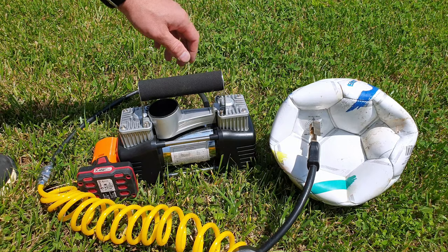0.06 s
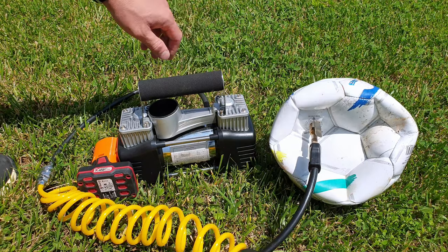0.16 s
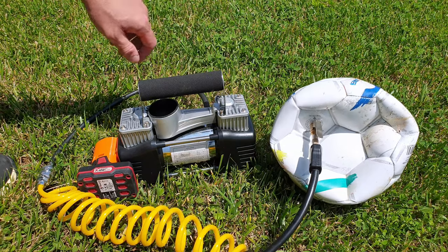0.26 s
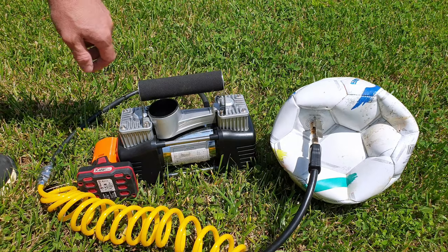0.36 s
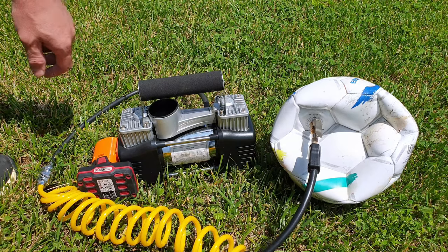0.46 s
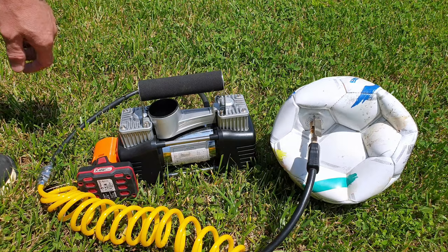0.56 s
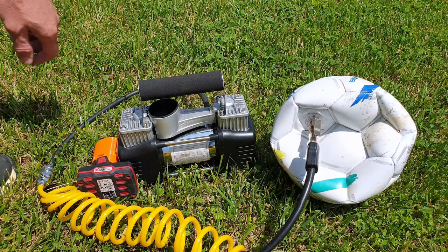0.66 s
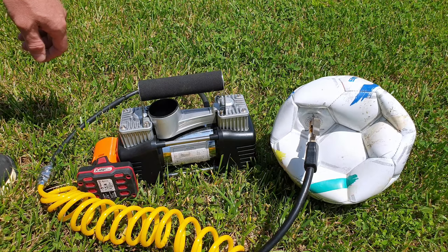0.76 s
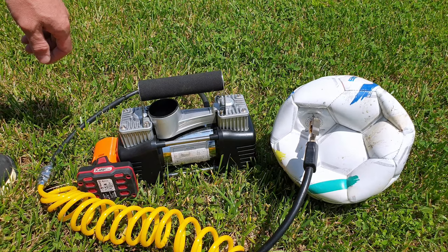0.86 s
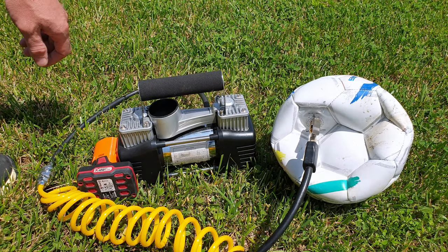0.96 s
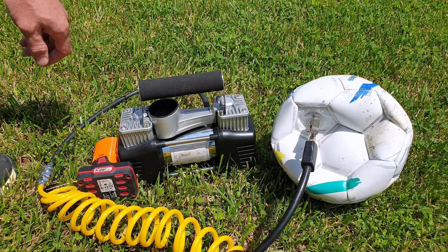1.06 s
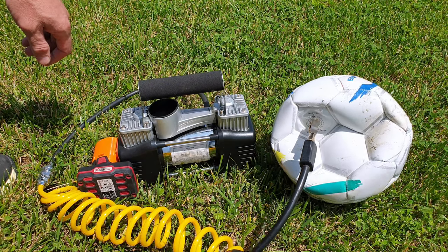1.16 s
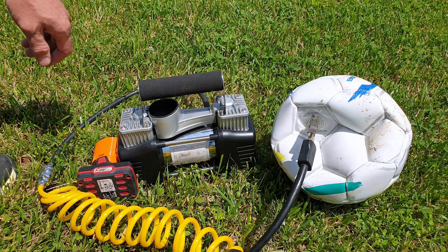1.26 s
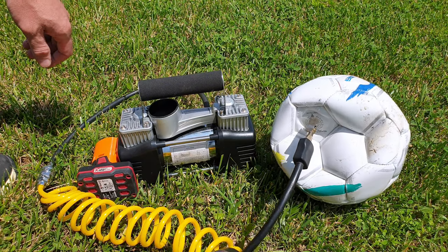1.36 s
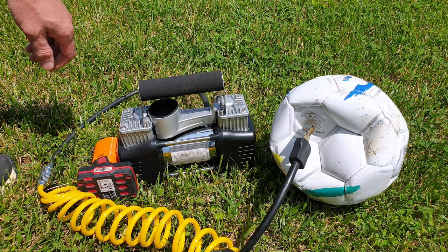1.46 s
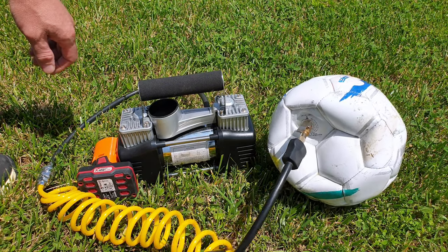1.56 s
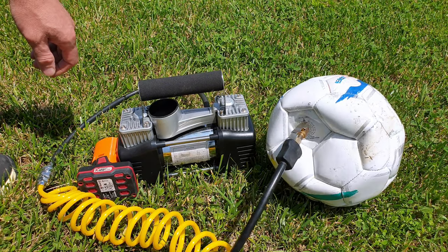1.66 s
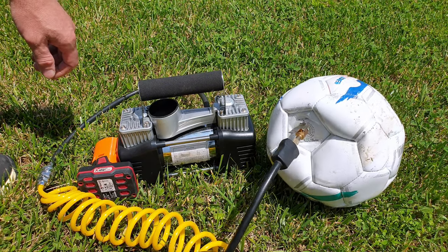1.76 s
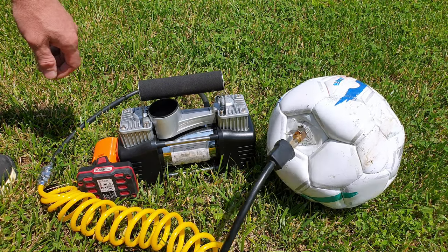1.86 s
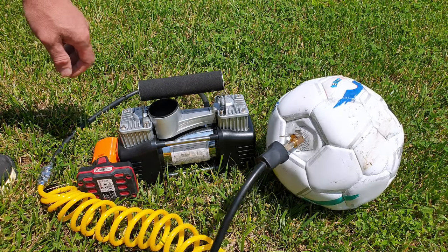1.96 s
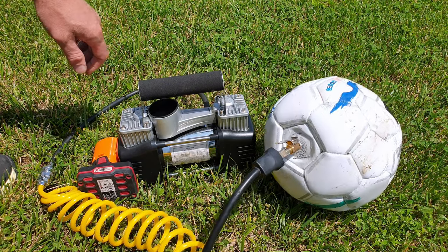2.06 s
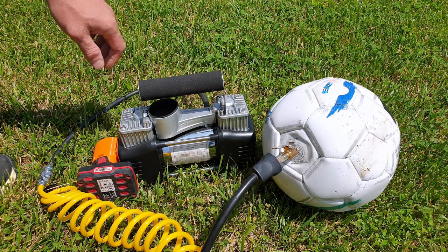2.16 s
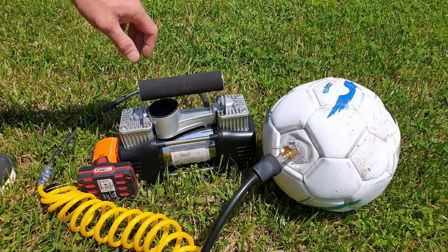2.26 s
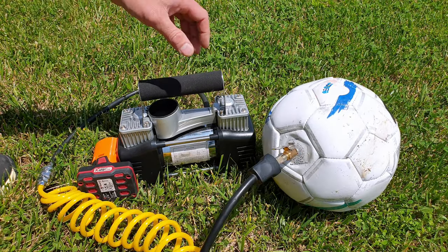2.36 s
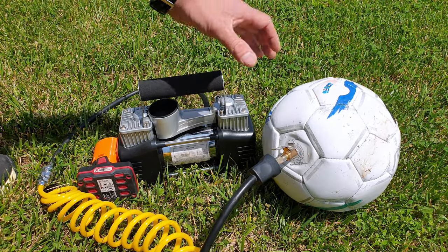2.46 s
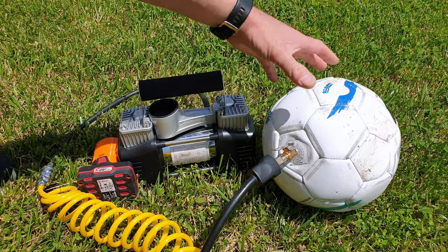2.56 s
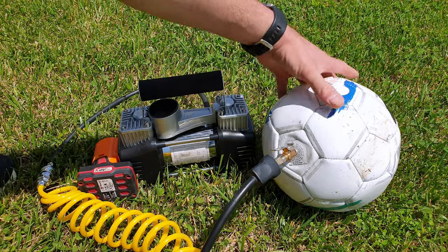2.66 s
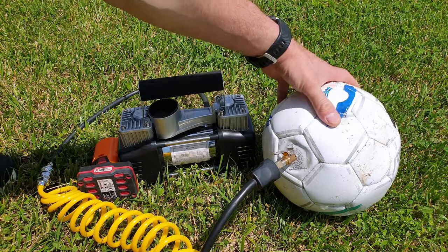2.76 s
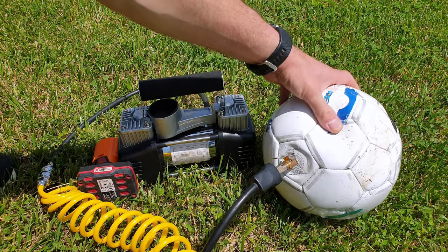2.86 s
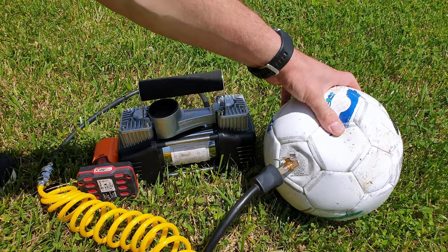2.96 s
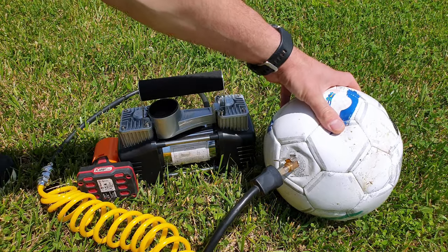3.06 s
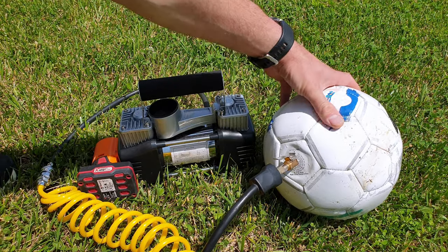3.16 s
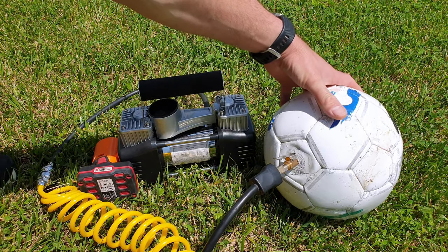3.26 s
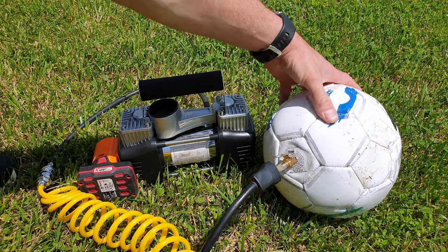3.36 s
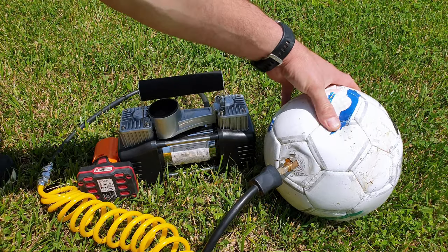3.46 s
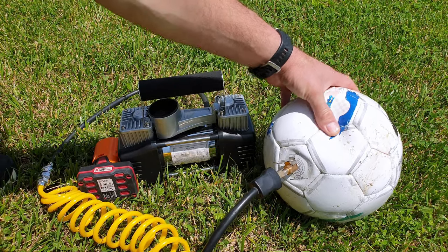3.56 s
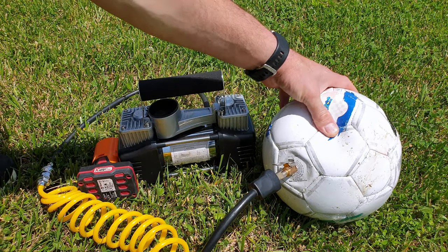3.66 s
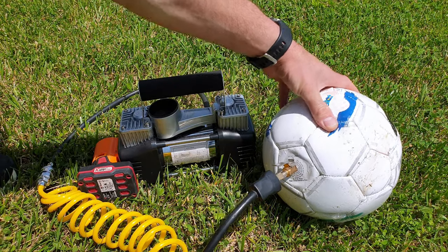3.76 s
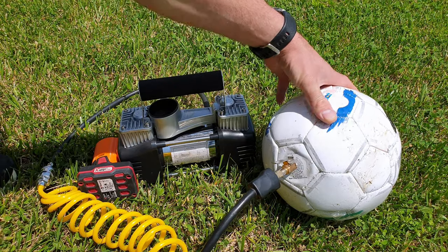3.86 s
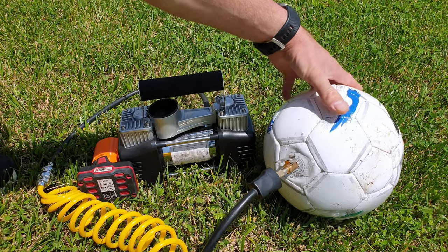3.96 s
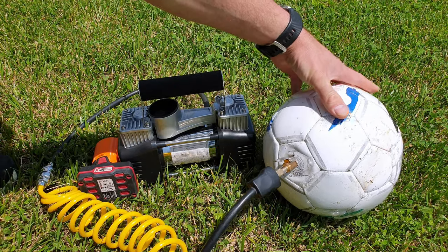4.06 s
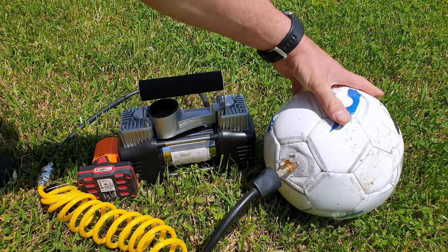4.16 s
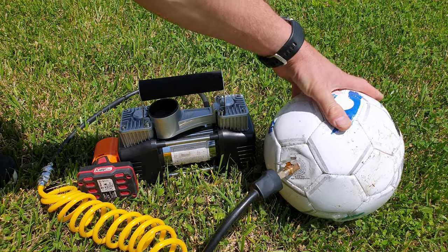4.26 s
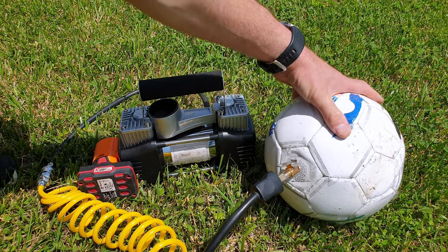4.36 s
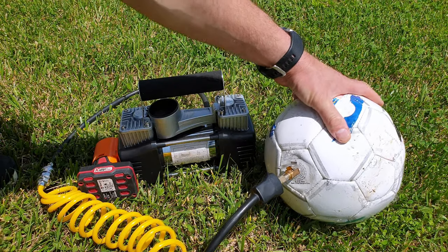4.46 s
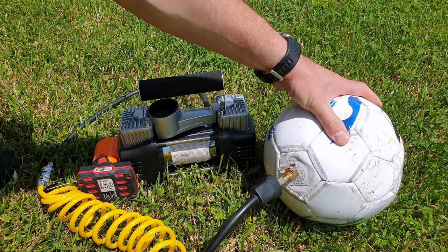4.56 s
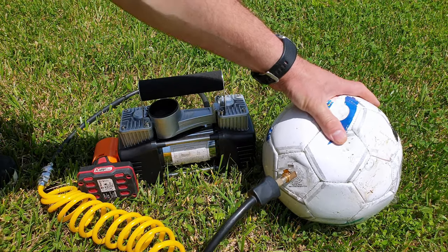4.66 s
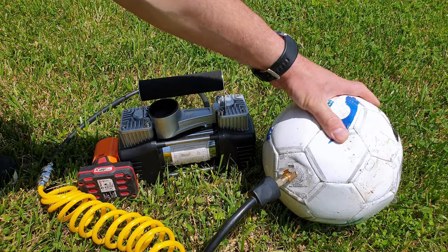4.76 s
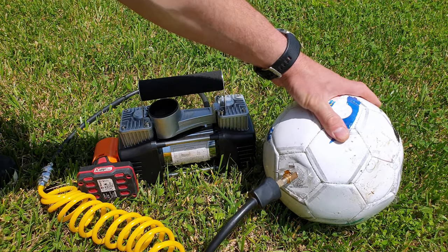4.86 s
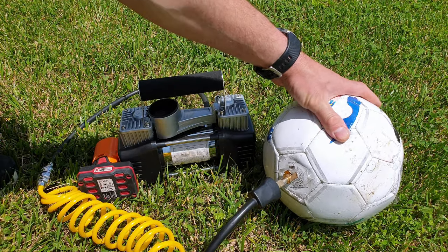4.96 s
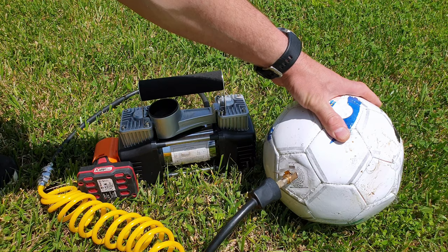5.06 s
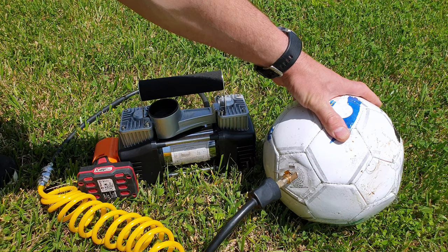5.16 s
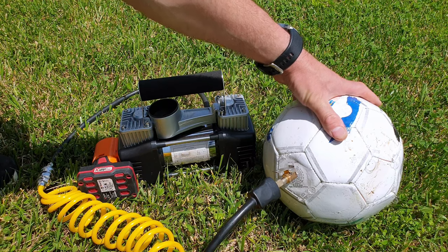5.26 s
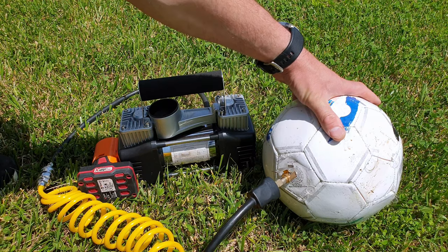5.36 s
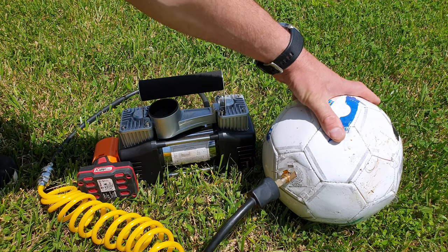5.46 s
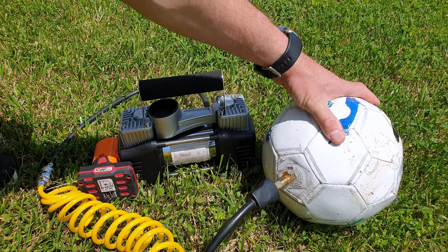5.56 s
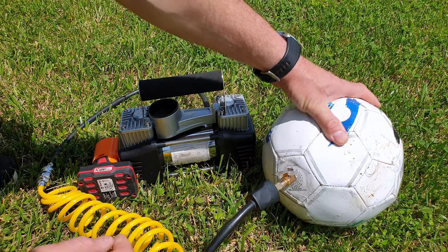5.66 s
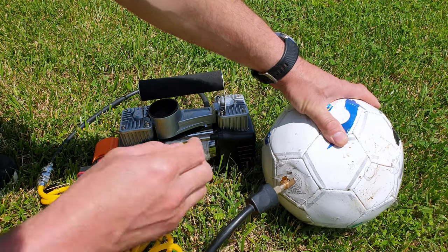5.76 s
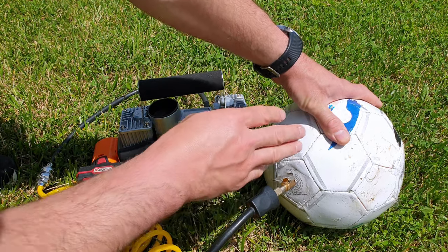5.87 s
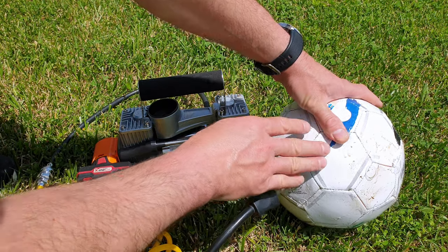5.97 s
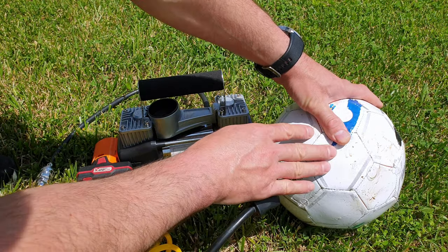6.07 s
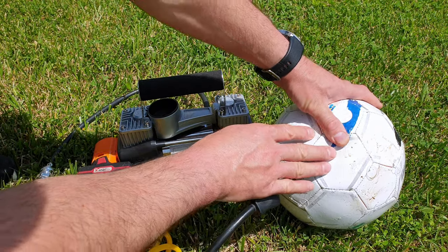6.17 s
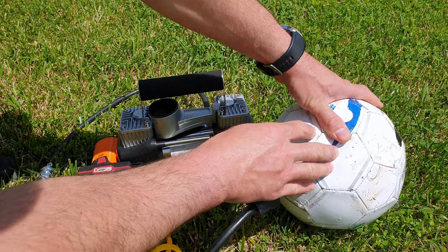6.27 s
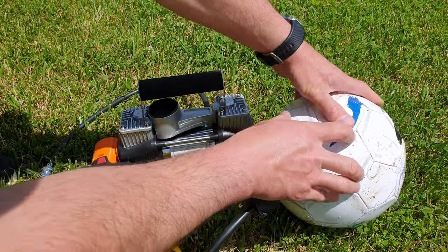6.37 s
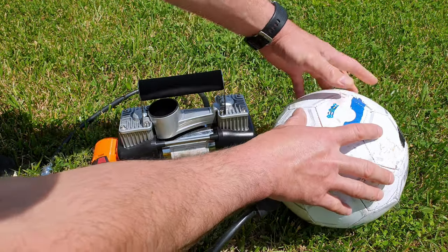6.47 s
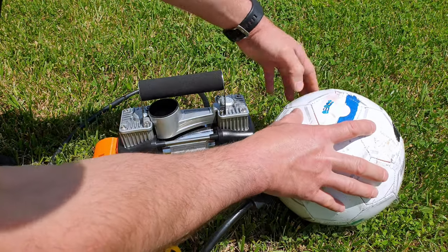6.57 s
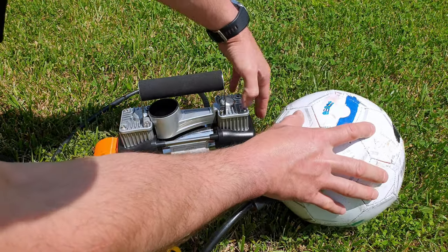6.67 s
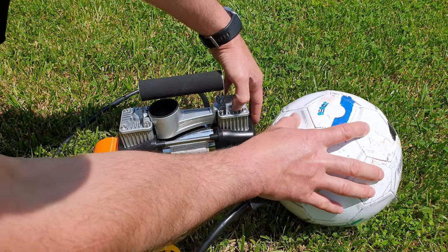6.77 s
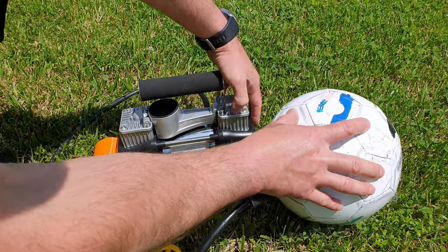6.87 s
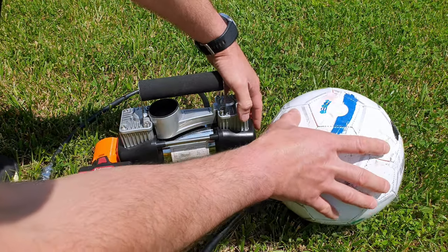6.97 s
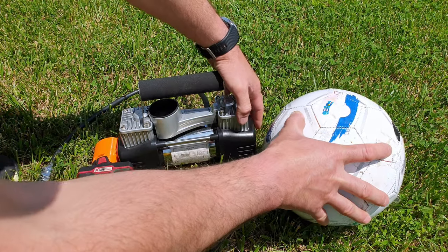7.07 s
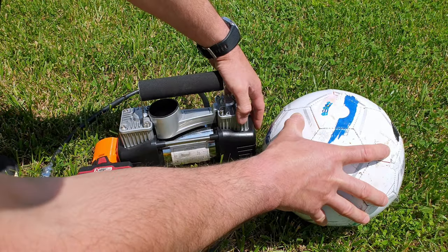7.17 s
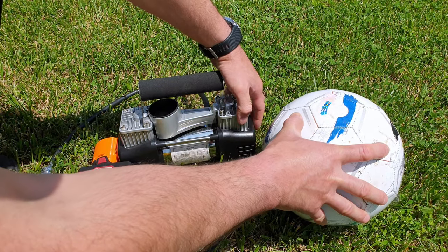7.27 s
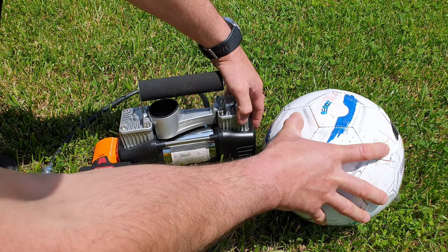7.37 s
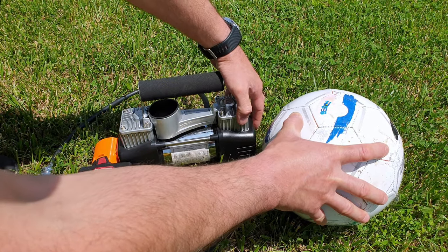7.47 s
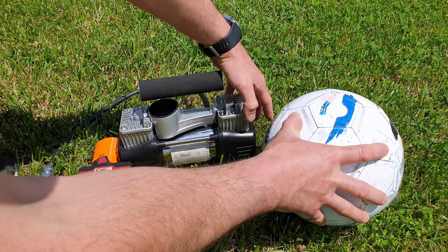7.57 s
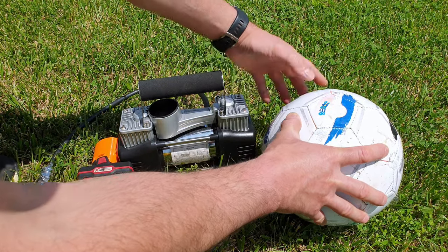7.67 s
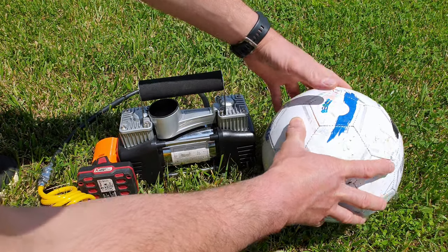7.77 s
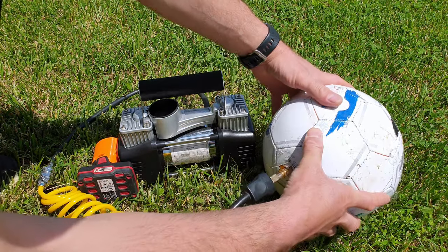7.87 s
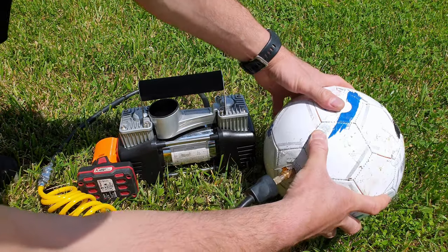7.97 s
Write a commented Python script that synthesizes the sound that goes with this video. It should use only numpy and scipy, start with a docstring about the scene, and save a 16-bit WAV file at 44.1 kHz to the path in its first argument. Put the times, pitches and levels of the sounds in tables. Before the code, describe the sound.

Close, harsh motor-like chugging of a portable air pump runs under load, then a switch click, a few slowing puffs, and near quiet.

```python
"""On a lawn, a small piston compressor pumps up a football; switched off, it coasts to rest in a few strokes.
The pump is a periodic source: crank harmonics carry the delivery and intake puffs and the valve clack,
while piston knocks, rubbing and hissing air excite the modes of its cylinder.
A breeze (coloured noise) touches the microphone and a bird calls twice (falling glides).
Hands near the pump alter its sound; as they take hold of the ball it bumps in damped resonances."""
import sys
import numpy as np
from scipy import signal
from scipy.fft import rfft, irfft, next_fast_len
from scipy.io import wavfile
from scipy.ndimage import uniform_filter1d

SR = 44100
rng = np.random.default_rng(int(sys.argv[2]) if len(sys.argv) > 2 else 0)


def put_to_file(sound):
    """Save the sound as 16-bit audio at rate SR, in the file named by the first command-line argument."""
    columns = np.atleast_2d(sound).T  # one column per channel
    safe = np.clip(columns, -1, 1)
    whole_steps = np.round(safe * 32767)
    wavfile.write(sys.argv[1], SR, whole_steps.astype(np.int16))


N = 353682
TIME = np.arange(N) / SR
HAND_MOVE_S = .15   # time a hand takes to move in or out


def from_db(db):
    """Level definition: amplitude ratio = 10^(level/20)."""
    return 10 ** (np.asarray(db) / 20)


def rms_one(x):
    """Normalisation to unit root-mean-square amplitude."""
    return x / np.sqrt(np.mean(x ** 2) + 1e-20)


def in_time(rows):
    """Linear interpolation: each column of a curve, sample by sample."""
    s, *columns = np.transpose(rows)
    return [np.interp(TIME, s, column) for column in columns]


def ramp(middle_s, length_s):
    """Linear transition from 0 to 1, centred on a moment."""
    return np.clip(.5 + (TIME - middle_s) / length_s, 0, 1)


def hold(s, length_s, fade_s):
    """Trapezoidal envelope: fades in around s, stays at 1, fades out around s + length_s."""
    return ramp(s, fade_s) - ramp(s + length_s, fade_s)


def drift(rate):
    """Band-limited random modulation: about `rate` new values a second, joined by lines; rms 1."""
    knots = rng.standard_normal(N // 20)
    return rms_one(np.interp(TIME * rate, np.arange(len(knots)), knots))


def colour(x, spectrum):
    """Linear filtering: a spectral envelope, interpolated over log frequency, weights a sound; rms 1."""
    hz, db = np.transpose(spectrum)
    size = next_fast_len(N)
    f = np.maximum(np.fft.rfftfreq(size, 1 / SR), 1)
    weight = from_db(np.interp(np.log(f), np.log(hz), db))
    return rms_one(irfft(rfft(x, size) * weight, size)[:N])


def noise(spectrum):
    """Random excitation: white noise shaped to the given spectral density; rms 1."""
    return colour(rng.standard_normal(N), spectrum)


def puffs(rows):
    """Damped resonance: each impulse swells to its peak and dies; rows of t/s, peak level/dB, f/Hz, width/Hz."""
    out = np.zeros(N)
    for s, db, hz, width_hz in rows:
        age = np.maximum(TIME - s, 0)
        swell = np.pi * width_hz * age / 2
        envelope = (swell * np.exp(1 - swell)) ** 2
        out += from_db(db) * envelope * np.sin(2 * np.pi * hz * age)
    return out


def bursts(rows, spectrum):
    """Transient noise that rises and decays; rows of t/s, peak rms level/dB, time to peak/s."""
    envelope = np.zeros(N)
    for s, db, peak_s in rows:
        age = np.maximum(TIME - s, 0) / peak_s
        envelope += from_db(db) * age * np.exp(1 - age)
    return envelope * noise(spectrum)


def steady(x, window_s=.3):
    """Automatic gain principle: evens out slow swells and keeps the mean level."""
    power = np.abs(uniform_filter1d(x ** 2, int(window_s * SR))) + 1e-20
    return x * np.sqrt(np.mean(power) / power)


# crank speed, which picks up, then sinks as the ball fills: t/s, f/Hz (turns per second)
CRANK_SPEED = [(0, 55.964), (0.35, 56.069), (1.8, 55.855), (3.2, 55.676), (5.1, 55.215), (7.4, 54.93)]


def crank_turns(start_angle=-.025):
    """Phase is the integral of frequency: the crank angle in turns."""
    speed, = in_time(CRANK_SPEED)
    return np.cumsum(speed) / SR + start_angle


# pump tone: t/s, tone (0 slack ball, 1 round ball, 2 round ball with a hand shading the pump)
PUMP_TONE = [(0, 0.17), (2.2, 0), (2.9, 0.94), (5.4, 1.27), (6.1, 1.76), (6.8, 1.9)]
# crank harmonics for the three pump tones: multiple of crank speed, level within its band/dB
SLACK_BALL = [(1, -39), (2, -11.5), (3, -27), (4, -15), (5, -22), (6, -14), (7, -10), (8, 0.5), (9, -7),
              (10, -7.5), (11, -6), (12, -16), (13, -13.5), (14, -31), (15, -26), (16, -7), (17, -11.5),
              (18, -10), (19, -16.5), (20, -13), (21, -19.5), (22, -23), (23, -27.5), (24, -21.5),
              (25, -25), (26, -9.5), (27, -7), (28, -18.5), (29, -3), (30, -10), (31, -11), (32, -26),
              (33, -66), (34, -49), (35, -60), (36, -30), (37, -25), (38, -30.5), (39, -34), (40, -24),
              (41, -26.5), (42, -37), (43, -52)]
ROUND_BALL = [(1, -40.5), (2, -13.5), (3, -29), (4, -18), (5, -22.5), (6, -17), (7, -11), (8, 0.5),
              (9, -12), (10, -7.5), (11, -7), (12, -20.5), (13, -18), (14, -46), (15, -27), (16, -13.5),
              (17, -18), (18, -14), (19, -24), (20, -18.5), (21, -26.5), (22, -26.5), (23, -26), (24, -31),
              (25, -25.5), (26, -28.5), (27, -18.5), (28, -31), (29, -14.5), (30, -18.5), (31, -13),
              (32, -16), (33, -47), (34, -40), (35, -45.5), (36, -15), (37, -19.5), (38, -34), (39, -35),
              (40, -20), (41, -37.5), (42, -39), (43, -57)]
HAND_SHADED = [(1, -52), (2, -15.5), (3, -30.5), (4, -19.5), (5, -26.5), (6, -22), (7, -15.5), (8, 1),
               (9, -15), (10, -3.5), (11, -5.5), (12, -14), (13, -17.5), (14, -26), (15, -17), (16, -15.5),
               (17, -27.5), (18, -13.5), (19, -22.5), (20, -21), (21, -24.5), (22, -40), (23, -41),
               (24, -32.5), (25, -21), (26, -49.5), (27, -22), (28, -53), (29, -19), (30, -23.5), (31, -8),
               (32, -10.5), (33, -19), (34, -43), (35, -55), (36, -35.5), (37, -24.5), (38, -65), (39, -46),
               (40, -30), (41, -27), (42, -40.5), (43, -62)]
# resonances struck in one turn (delivery, valve clack, piston thud, intake), used for their phases:
# crank angle/turns, f/Hz, width/Hz, relative level/dB
STROKE_RESONANCES = [(-0.003, 588, 299, -4.5), (0.017, 979.6, 338, -15.5), (0.256, 1604, 312, -13),
                     (0.248, 186, 117, -14.5), (0.584, 515.2, 346, -8), (0.576, 695, 102.1, -4.5)]


def pulsation(turns, air_db, clack_db, buzz_db, air_rough=0.03, clack_rough=0.07, wander_db=1.0):
    """Fourier series of the crank: strokes set the phases, the pump tone the balance of harmonics."""
    tone, = in_time(PUMP_TONE)
    tones = np.array([SLACK_BALL, ROUND_BALL, HAND_SHADED])[:, :, 1]
    order = np.arange(1, tones.shape[1] + 1)
    hz = order * np.mean(np.array(CRANK_SPEED)[:, 1])
    response = 0
    for angle, ring_hz, width_hz, db in STROKE_RESONANCES:
        resonance = 1 / (1 + 2j * (hz - ring_hz) / width_hz) ** 3
        response = response + from_db(db) * np.exp(-2j * np.pi * order * angle) * resonance
    # air below 1350 Hz, valve clack up to 1950 Hz, cylinder head buzz above
    band = np.digitize(hz, [1350, 1950])
    voices = [(air_db, air_rough), (clack_db, clack_rough), (buzz_db, clack_rough)]
    out = 0
    for i, (level_db, rough) in enumerate(voices):
        wave, power = 0, 0
        for k in np.flatnonzero(band == i):
            balance_db = np.interp(tone, np.arange(3), tones[:, k])
            # the high harmonics wander more than the low ones
            gain = from_db(balance_db + wander_db * order[k] / len(order) * drift(4))
            wave = wave + gain * np.sin(2 * np.pi * order[k] * turns + np.angle(response[k]))
            power = power + gain ** 2 / 2
        out = out + from_db(level_db) * wave / np.sqrt(power) * (1 + rough * drift(220))
    return out


def turbulence(turns, spectrum, depth, peak_angle):
    """Amplitude modulation: coloured noise that swells once a turn; rms 1."""
    return rms_one(noise(spectrum) * (1 + depth * np.cos(2 * np.pi * (turns - peak_angle))))


def scrape(turns, memory_turns=30):
    """Autoregression from turn to turn: the piston ring meets a roughness whose pattern changes slowly."""
    turn = np.floor(turns - np.floor(turns[0])).astype(int)
    along = np.arange(N) - np.searchsorted(turn, turn)   # samples since the turn began
    keep = np.exp(-1 / memory_turns)
    pattern = rng.standard_normal((turn[-1] + 1, along.max() + 1))
    for k in range(1, len(pattern)):
        pattern[k] = keep * pattern[k - 1] + np.sqrt(1 - keep ** 2) * pattern[k]
    return pattern[turn, along]


# piston and rod knocks in one turn: crank angle/turns, relative level/dB
PISTON_KNOCKS = [(.16, -0.5), (0.254, 1.5), (.355, 7.5), (.46, -3.5), (0.561, -15)]
# rubbing of the piston over one turn: crank angle/turns, relative level/dB
PISTON_RUB = [(.02, -16.5), (.13, -15), (.25, -0.5), (.35, 1), (.48, -3), (.68, -7.5), (.88, -11)]
# broad colour of the rattle: f/Hz, relative level/dB
RATTLE_COLOUR = [(1500, -32), (2300, -1.5), (2800, -6), (4200, 2), (6400, -1.5), (7500, -0.5), (8200, -13),
                 (9000, -0.5), (12000, -3.5), (13500, -7.5), (15600, -10.5)]


def rattle(turns, jitter_s=.00002, uneven_db=1.8, knock_db=-4.5, hiss_db=-8, flutter_db=0.5):
    """Impact and friction excitation: knocks at fixed crank angles, rubbing and a hiss of air; rms 1."""
    knocks, whole = np.zeros(N), np.arange(int(turns[-1]))
    for angle, db in PISTON_KNOCKS:
        s = np.interp(whole + angle, turns, TIME) + jitter_s * rng.standard_normal(len(whole))
        at = np.clip(np.round(s * SR).astype(int), 0, N - 1)
        knocks[at] += from_db(db + uneven_db * rng.standard_normal(len(whole)))
    angle, db = np.transpose(PISTON_RUB)
    hiss = np.diff(rng.standard_normal(N + 1))   # brighter than the rubbing
    rub_gain = from_db(np.interp(turns, angle, db, period=1))
    rub = rms_one(rub_gain * (scrape(turns) + from_db(hiss_db) * hiss))
    # the rattle flutters slowly, out of step with the crank
    flutter = 2 * np.pi * .277 * turns
    gain = from_db(flutter_db * (np.sin(flutter) + np.sin(2 * flutter)))
    return colour(gain * (from_db(knock_db) * rms_one(knocks) + rub), RATTLE_COLOUR)


# ringing modes of the finned aluminium cylinder: f/Hz, width/Hz, relative level/dB
CYLINDER_MODES = [(3122, 75, 3), (3608, 55, 1.5), (4414, 77, -8.5), (4840, 99, -10), (5450, 146, -2),
                  (5740, 135, -5), (5907, 144, 0.5), (6910, 110, -8), (7570, 180, -7.5), (8820, 160, -9),
                  (9250, 180, -12.5), (10240, 210, -3.5), (10650, 92, -5.5), (11500, 720, -10.5)]


def cylinder(x, low_db, middle_db, ring_db=13, wander_db=0.8):
    """Modal superposition: a sound keeps the cylinder's modes ringing evenly, each with a slight wander."""
    out = x.copy()
    for hz, width_hz, db in CYLINDER_MODES:
        hand_db = low_db if 3400 < hz < 5600 else middle_db if 5600 < hz < 6500 else 0
        b, a = signal.iirpeak(hz, hz / width_hz, fs=SR)
        ringing = steady(signal.lfilter(b, a, x + 1e-18))
        out += from_db(db + ring_db + hand_db + wander_db * drift(3.1)) * ringing
    return out


# hands or arms near the pump: t/s, length/s, then the change of level/dB of
# clack, buzz, rattle, modes near 4.5 kHz and modes near 6 kHz. In order, a hand passes over the pump,
# holds the ball, loosens its grip, grips again; the other arm reaches in front, its hand covers the
# pump's end; the first hand leaves the ball, comes down on the cylinder head and stays by the switch
HAND_POSITIONS = [(2.44, .24, 2, 3, .5, 1, 5), (2.752, 1.45, -0.5, -1, 0, -2.5, 0),
                  (4.08, 0.28, 1.4, -1.2, 0, 0, -1), (4.5, 0.33, -2, 0.5, .7, 2, .5),
                  (5.95, 0.84, -1, -0.5, -2.4, -7, -2.5), (6.15, 0.52, -3, 1.5, 0, -1, 0.5),
                  (6.36, .16, 1.5, -1, -0.5, -1, 8.5), (6.64, 0.17, -2, 0, -0.5, 1, 9),
                  (6.78, .8, -1, 1, -2, 3, 0)]


def hands():
    """Reflection and screening: what hands add in dB to clack, buzz, rattle and two groups of modes."""
    return sum(np.outer(db, hold(s, length, HAND_MOVE_S)) for s, length, *db in HAND_POSITIONS)


# an arm reaches across the pump; delay and its rms sway in seconds
ARM_AT_S, ARM_ECHO_DB, ARM_ECHO_S, ARM_SWAY_S, ARM_SWAYS_PER_S = 5.9, -7.5, .00085, .00006, 4


def arm_echo(x):
    """Comb filtering: a short, swaying echo once the arm is in front; gain compensates its added power."""
    delay_s = ARM_ECHO_S + ARM_SWAY_S * drift(ARM_SWAYS_PER_S)
    gain = from_db(ARM_ECHO_DB) * ramp(ARM_AT_S, HAND_MOVE_S)
    return (x + gain * np.interp(TIME - delay_s, TIME, x)) / np.sqrt(1 + gain ** 2)


# air pulsation, growing with the back pressure: t/s, rms level/dB
AIR_LEVEL = [(0, -20.8), (2.2, -19.4), (2.9, -18.2), (4.4, -17.4), (7.4, -18.2)]
# turbulence in the intake and hose: f/Hz, relative spectral density/dB
TURBULENCE_COLOUR = [(60, -15.5), (150, -13.5), (280, -10.5), (450, -4), (600, -6.5), (780, -7.5),
                     (1000, -10), (1280, -14.5), (1650, -10), (2000, -20.5), (2600, -26), (4000, -33.5)]
# chatter of the valve plate and of the cylinder head: f/Hz, relative spectral density/dB
VALVE_CHATTER_COLOUR = [(900, -39), (1350, -15.5), (1550, -1), (1680, -1.5), (1880, -6.5), (2100, -19),
                        (2600, -44)]
HEAD_CHATTER_COLOUR = [(1500, -34.5), (1900, -2.5), (2050, -0.5), (2250, -7), (2450, -12.5), (3000, -33)]
# base levels of valve clack, cylinder head buzz and piston rattle under load, before hands and damping
CLACK_DB, BUZZ_DB, RATTLE_DB = -33, -43, -40.2
CLACK_BUILD_S, CLACK_SOFTER_DB = 0.49, 3   # the valve clacks softly until the hose is under pressure
# noise re. each clack: the valve plate seats cleanly at first, then chatters as the pressure builds
TIGHT_DB, LOOSE_DB, LOOSENS_MIDDLE_S, LOOSENS_OVER_S = -10.5, -6, 1.4, .8
# a hand comes to rest on the cylinder head, by the switch, and damps its buzz and the chatter
HEAD_HELD_S, BUZZ_DAMPED_DB, CHATTER_DAMPED_DB = 6.62, 15, 6
POWER_OFF_S = 7.4395


def loaded_compressor(turbulence_db=-39):
    """Periodic source plus cyclostationary noise: the pump runs under load until the power goes off."""
    turns = crank_turns()
    air_db, = in_time(AIR_LEVEL)
    hand_clack_db, hand_buzz_db, hand_rattle_db, low_db, middle_db = hands()
    held = ramp(HEAD_HELD_S, HAND_MOVE_S)
    clack_db = CLACK_DB + hand_clack_db - CLACK_SOFTER_DB * np.maximum(1 - TIME / CLACK_BUILD_S, 0)
    buzz_db = BUZZ_DB + hand_buzz_db - BUZZ_DAMPED_DB * held
    loosened = ramp(LOOSENS_MIDDLE_S, LOOSENS_OVER_S)
    chatter_db = TIGHT_DB + (LOOSE_DB - TIGHT_DB) * loosened - CHATTER_DAMPED_DB * held
    running = pulsation(turns, air_db, clack_db, buzz_db)
    running += from_db(turbulence_db) * turbulence(turns, TURBULENCE_COLOUR, depth=0.14, peak_angle=0.75)
    # no two clacks are quite alike, so each carries its share of noise
    valve_chatter = turbulence(turns, VALVE_CHATTER_COLOUR, depth=0.26, peak_angle=0.59)
    running += from_db(clack_db + chatter_db) * valve_chatter
    head_chatter = turbulence(turns, HEAD_CHATTER_COLOUR, depth=0.4, peak_angle=0.74)
    running += from_db(buzz_db + chatter_db - 1) * head_chatter   # the head chatters 1 dB less
    ringing_rattle = rms_one(cylinder(rattle(turns), low_db, middle_db))
    running += from_db(RATTLE_DB + hand_rattle_db) * arm_echo(ringing_rattle)
    powered = 1 - ramp(POWER_OFF_S, 0.0025)
    return powered * running


# a light breeze that dies away: t/s, mean level/dB
BREEZE_LEVEL = [(0, -58), (2, -50), (4.3, -55.5), (6.1, -53.5), (7.47, -60), (7.6, -68)]
# gusts on the microphone: middle t/s, length/s, peak rms level/dB
WIND_GUSTS = [(1.62, .6, -45), (2.27, .35, -44), (2.84, .22, -39), (3.75, .3, -37.5), (5.37, .2, -47),
              (5.87, .35, -46.5)]
# colours of wind, rustle and hiss: f/Hz, relative spectral density/dB
WIND_COLOUR = [(20, -26), (32, -14), (45, -7), (72, 2.5), (110, -1.5), (200, -16.5), (500, -37)]
SOFT_RUSTLE_COLOUR = [(29, -38), (50, -1), (77, -3), (265, -8.5), (592, -3), (1180, -12), (2500, -33),
                      (3250, -55), (5500, -120)]
FAINT_HISS_COLOUR = [(880, -28), (1500, -5), (1640, -9), (2750, -6), (3120, -9), (4230, -3.5), (7450, -1),
                     (8540, -4), (11300, 1), (15500, -4)]
BREEZE_FLUTTER_DB, BREEZE_FLUTTER_PER_S = 2, 9
# soft rustle: a constant floor, and a swell added to it as the ball is handled
RUSTLE_FLOOR_DB, RUSTLE_SWELL_DB, RUSTLE_S, RUSTLE_LENGTH_S, RUSTLE_FADE_S = -68.5, -67, 7.8, 0.15, .04
# a faint background hiss, steady at one level, then at a higher one from about the first bump
HISS_FLOOR_DB, HISS_DB, HISS_MIDDLE_S, HISS_RISE_S = -72, -61, 7.666, .008


def background():
    """Coloured noise: breeze and gusts on the microphone, a soft rustle, and a faint background hiss that steps
    up as the ball is bumped."""
    breeze_db, = in_time(BREEZE_LEVEL)
    breeze = from_db(breeze_db + BREEZE_FLUTTER_DB * drift(BREEZE_FLUTTER_PER_S))
    gusts = sum(from_db(db) * np.sin(np.pi * ramp(s, length)) ** 2 for s, length, db in WIND_GUSTS)
    swell = hold(RUSTLE_S, RUSTLE_LENGTH_S, RUSTLE_FADE_S)
    rustle = from_db(RUSTLE_FLOOR_DB) + from_db(RUSTLE_SWELL_DB) * swell
    hiss = from_db(HISS_FLOOR_DB + (HISS_DB - HISS_FLOOR_DB) * ramp(HISS_MIDDLE_S, HISS_RISE_S))
    wind = (breeze + gusts) * noise(WIND_COLOUR)
    return wind + rustle * noise(SOFT_RUSTLE_COLOUR) + hiss * noise(FAINT_HISS_COLOUR)


# falling bird notes: t/s, length/s, start f/Hz, end f/Hz, peak level/dB
BIRD_NOTES = [(.555, 0.039, 5500, 4300, -42), (2.585, .06, 5600, 4200, -42)]


def bird(quaver=0.03):
    """Frequency modulation: thin, slightly quavering whistles that glide down."""
    out = np.zeros(N)
    for s, length, start_hz, end_hz, db in BIRD_NOTES:
        along = np.clip((TIME - s) / length, 0, 1)
        glide_hz = end_hz + (start_hz - end_hz) * (1 - along) ** 1.2
        hz = glide_hz * (1 + quaver * drift(500))
        out += from_db(db) * np.sin(np.pi * along) * np.sin(2 * np.pi * np.cumsum(hz) / SR)
    return out


# click of the rocker switch: t/s, peak rms level/dB, time to peak/s
SWITCH_CLICK = [(7.4348, -29.5, 0.0014)]
# ring of the switch housing: t/s, peak level/dB, f/Hz, width/Hz
HOUSING_RING = [(7.4345, -23, 4660, 420)]


def switch():
    """Impact excitation: the rocker's noise burst, and the damped ring of its housing."""
    return bursts(SWITCH_CLICK, RATTLE_COLOUR) + puffs(HOUSING_RING)


# last puffs of the coasting piston: t/s, peak level/dB, f/Hz, width/Hz
COASTING_PUFFS = [(7.4408, -10.5, 527, 262), (7.452, -14, 473, 200), (7.462, -12.5, 555, 210),
                  (7.4749, -14.5, 493, 149), (7.4927, -15.5, 566, 163), (7.516, -27, 493, 200),
                  (7.5217, -22.5, 478, 99), (7.568, -30.5, 530, 240), (7.6035, -40, 470, 240)]
# the valve plate shuts on those strokes: t/s, peak rms level/dB, time to peak/s
COASTING_RATTLES = [(7.4445, -44, 0.0031), (7.466, -40, .003), (7.497, -43, .0035), (7.531, -65, 0.0095),
                    (7.572, -63, 0.0027)]
# the valve plate rings on as it seats: t/s, peak level/dB, f/Hz, width/Hz
COASTING_VALVE_RINGS = [(7.444, -32, 5750, 190), (7.467, -33, 5600, 190), (7.498, -35, 5600, 150),
                        (7.498, -39, 4500, 200), (7.498, -40, 4980, 200), (7.529, -60, 5930, 80),
                        (7.571, -53, 5620, 160)]


def coasting(clack_db=-24, clack_hz=1720, clack_width_hz=170, hose_db=-16, hose_hz=980, hose_width_hz=280,
             air_db=-25, air_s=0.0063):
    """Free decay of the crank: last puffs, each with hose ring, valve clack and gust of air, and rattles."""
    clacks = [(s + 0.00224, db + clack_db, clack_hz, clack_width_hz) for s, db, _, _ in COASTING_PUFFS]
    hose = [(s, db + hose_db, hose_hz, hose_width_hz) for s, db, _, _ in COASTING_PUFFS]
    gusts = [(s, db + air_db, air_s) for s, db, _, _ in COASTING_PUFFS]
    strokes = puffs(COASTING_PUFFS) + puffs(clacks) + puffs(hose) + bursts(gusts, TURBULENCE_COLOUR)
    return strokes + bursts(COASTING_RATTLES, RATTLE_COLOUR) + puffs(COASTING_VALVE_RINGS)


# hands bump the ball: t/s, peak level/dB, f/Hz, width/Hz
BALL_BUMPS = [(7.665, -38, 140, 220), (7.68, -33, 68, 42), (7.684, -51, 200, 130), (7.736, -44, 110, 100),
              (7.786, -47, 380, 500), (7.8, -53, 90, 70), (7.957, -50, 650, 700)]
# fingers slap the ball's skin: t/s, peak rms level/dB, time to peak/s
FINGER_SLAPS = [(7.6658, -49, 0.0011), (7.959, -53, .0012)]
# colour of the slapped skin: f/Hz, relative spectral density/dB
SKIN_COLOUR = [(300, 5), (900, -5), (2500, -14), (7000, -17), (15000, -18)]


def ball():
    """Impact response: hands excite damped resonances of the ball, fingers short noise on its skin."""
    return puffs(BALL_BUMPS) + bursts(FINGER_SLAPS, SKIN_COLOUR)


def scene():
    """Linear superposition: all sources add at one microphone, in the open air."""
    compressor = loaded_compressor() + switch() + coasting()
    return (compressor + background() + bird() + ball())[None]


CUTOFF_HZ = 15600


def record(dry):
    """Low-pass filtering: an elliptic filter cuts the top steeply."""
    return signal.sosfilt(signal.ellip(12, .1, 90, CUTOFF_HZ, fs=SR, output="sos"), dry)


dry = scene()
out = record(dry)
put_to_file(out)
```